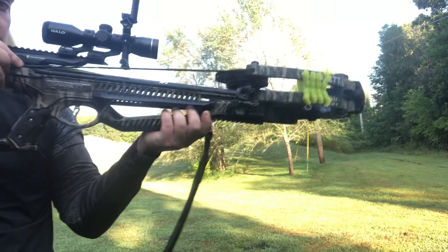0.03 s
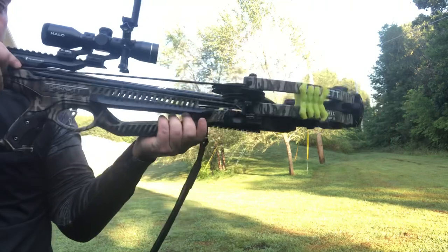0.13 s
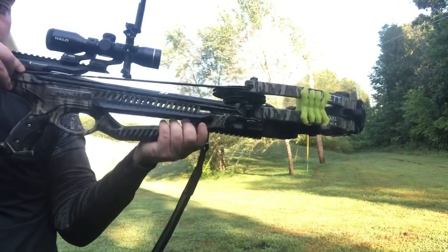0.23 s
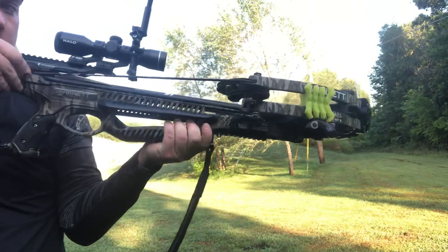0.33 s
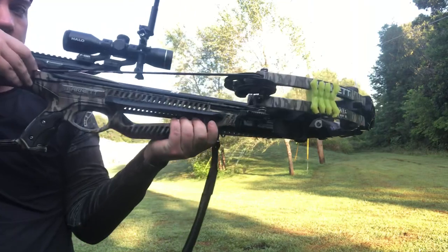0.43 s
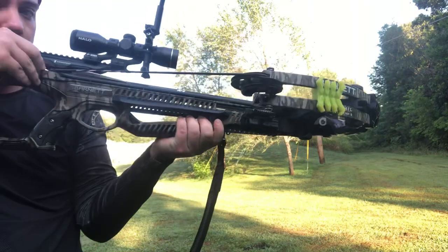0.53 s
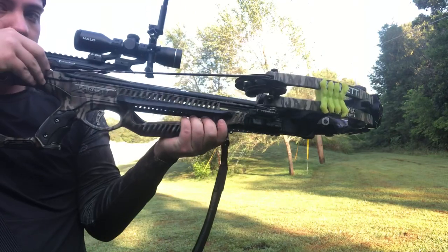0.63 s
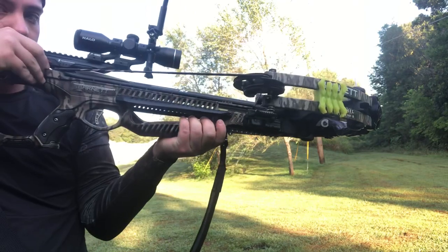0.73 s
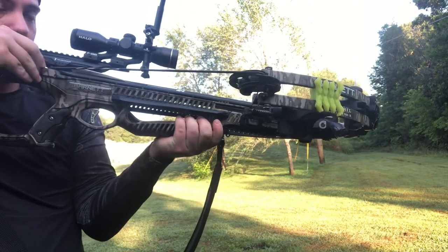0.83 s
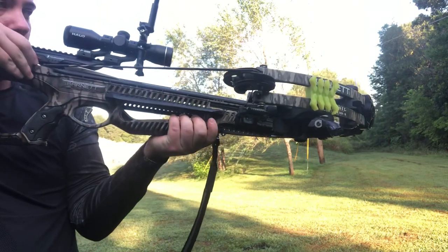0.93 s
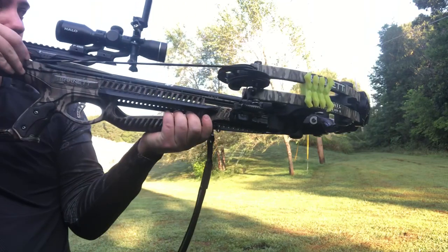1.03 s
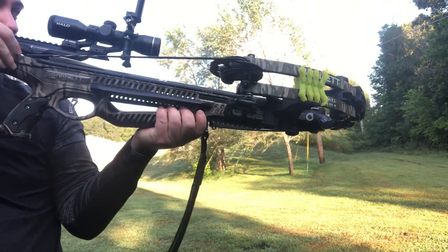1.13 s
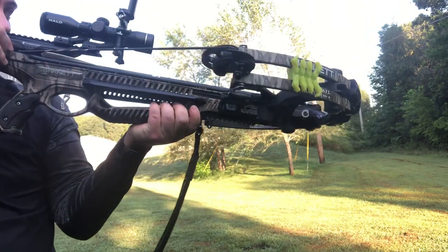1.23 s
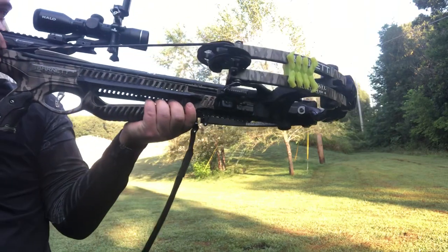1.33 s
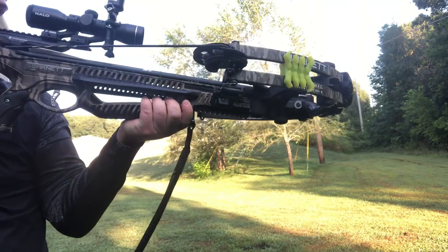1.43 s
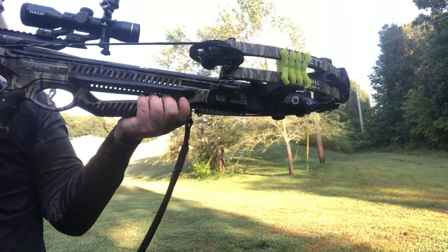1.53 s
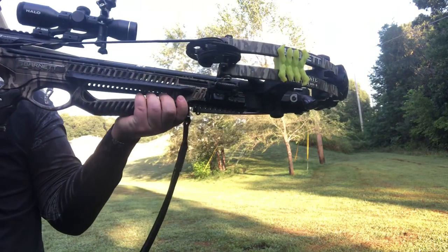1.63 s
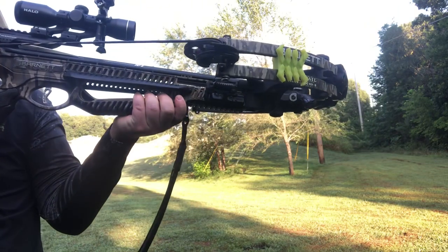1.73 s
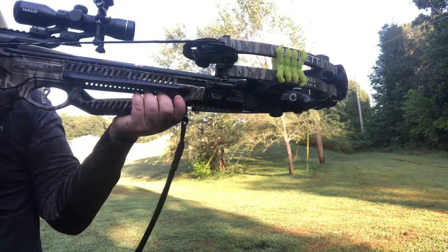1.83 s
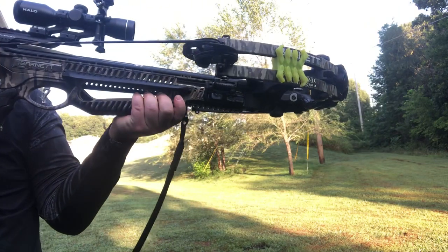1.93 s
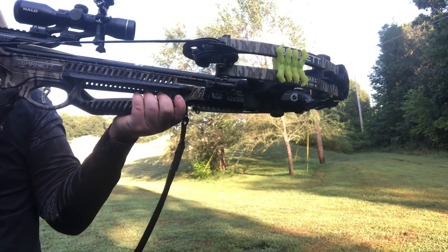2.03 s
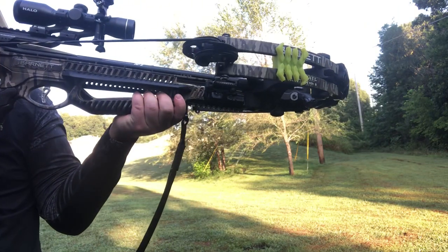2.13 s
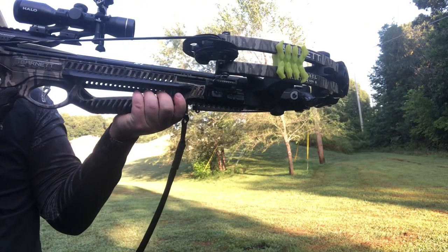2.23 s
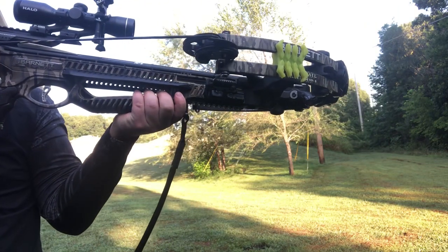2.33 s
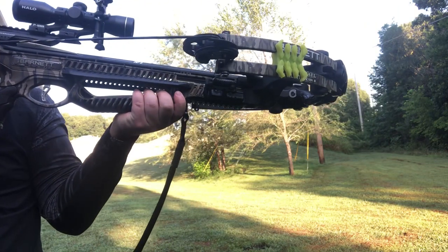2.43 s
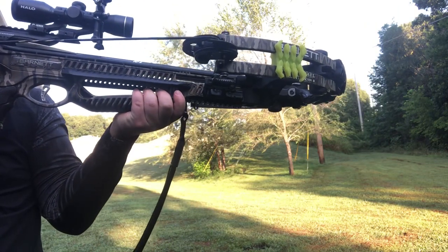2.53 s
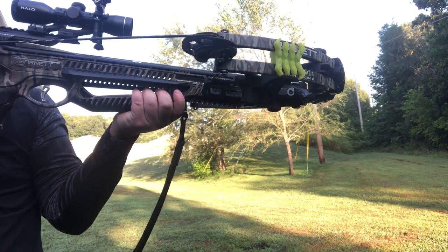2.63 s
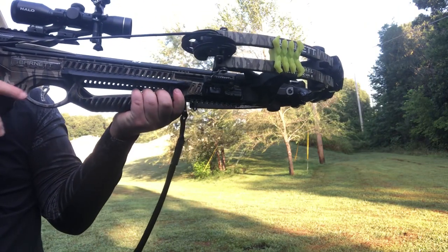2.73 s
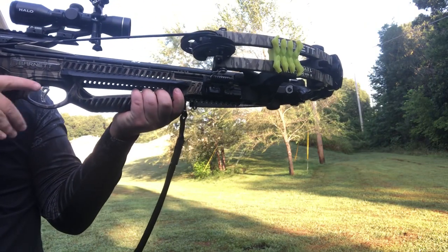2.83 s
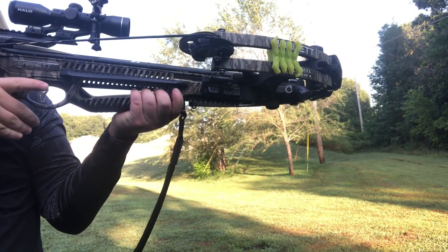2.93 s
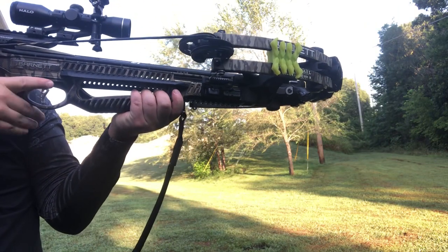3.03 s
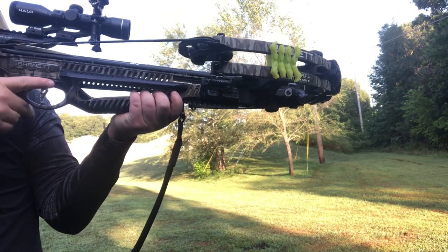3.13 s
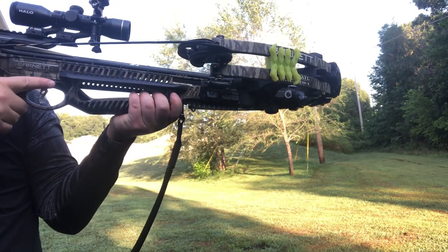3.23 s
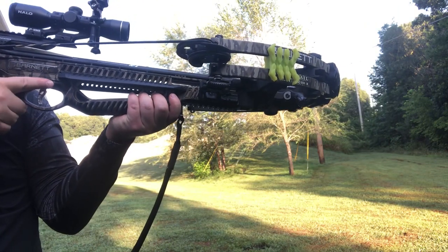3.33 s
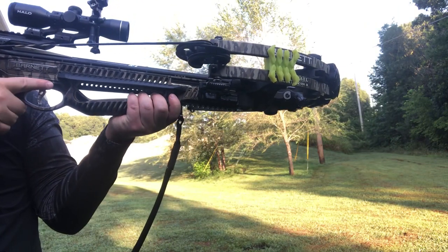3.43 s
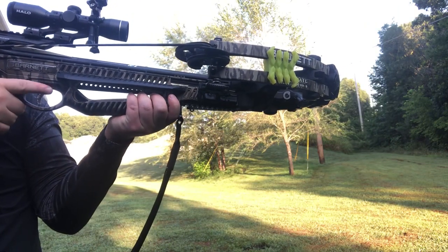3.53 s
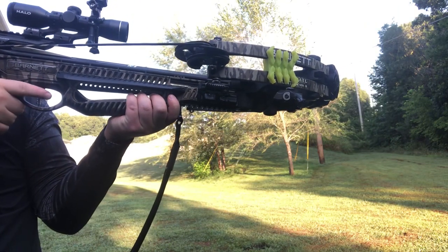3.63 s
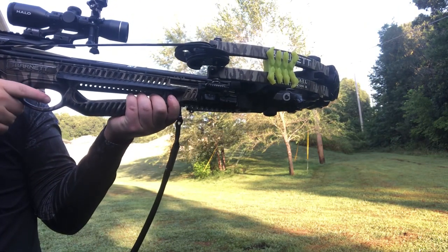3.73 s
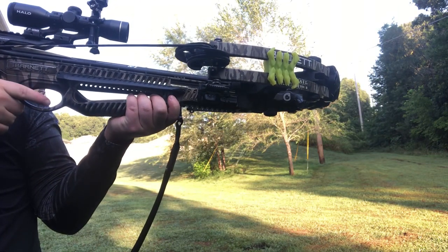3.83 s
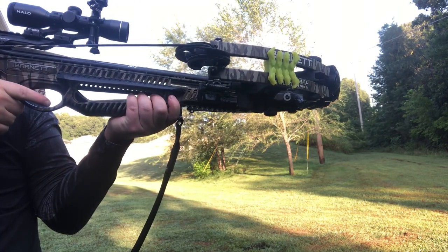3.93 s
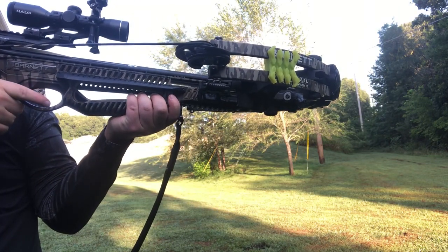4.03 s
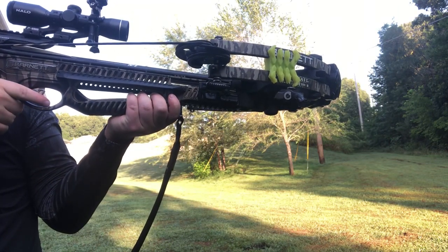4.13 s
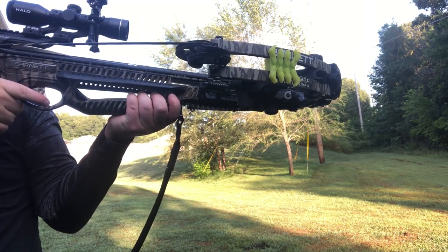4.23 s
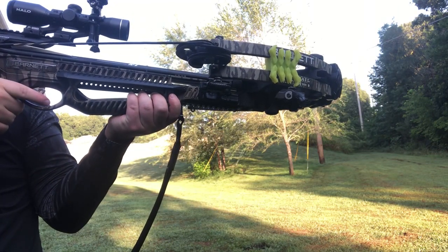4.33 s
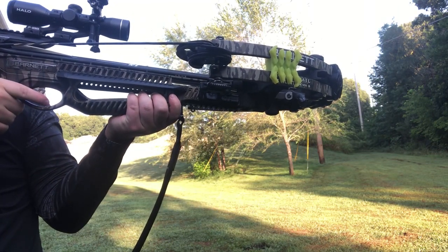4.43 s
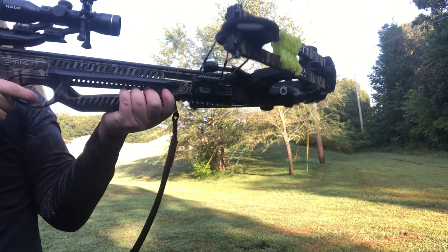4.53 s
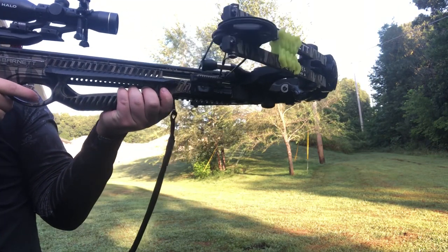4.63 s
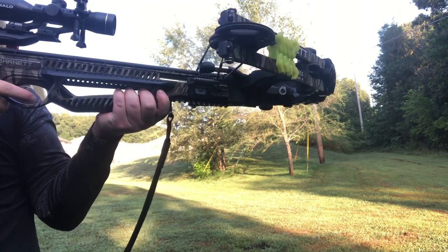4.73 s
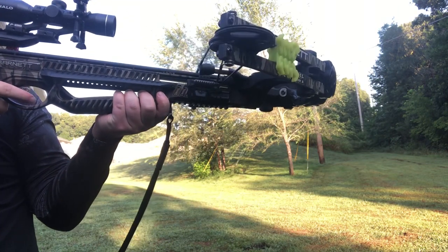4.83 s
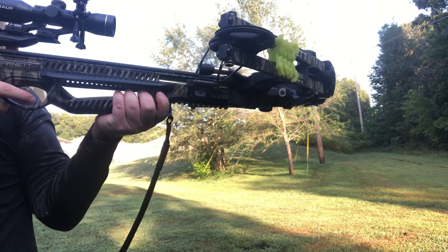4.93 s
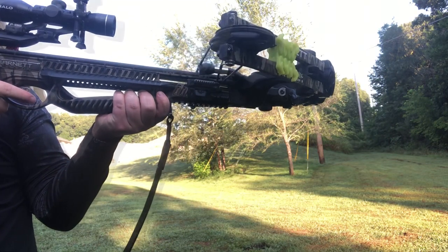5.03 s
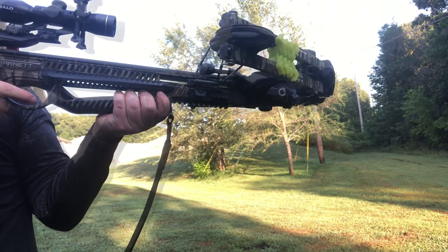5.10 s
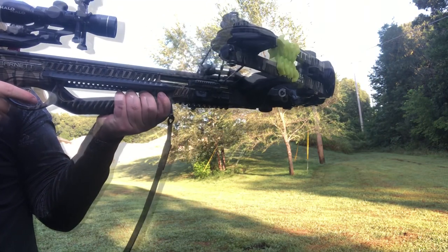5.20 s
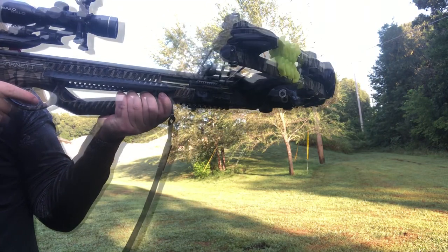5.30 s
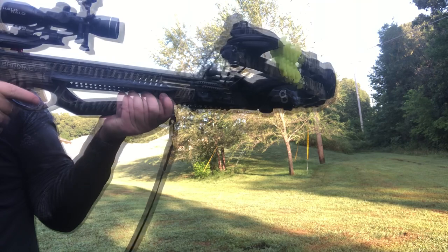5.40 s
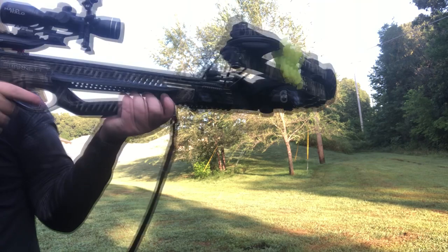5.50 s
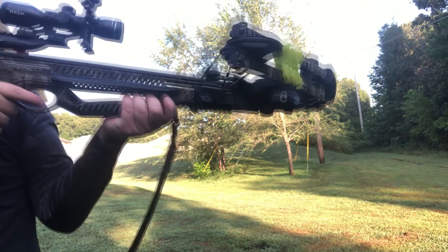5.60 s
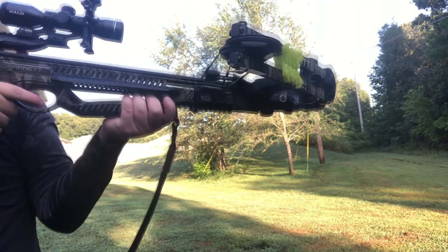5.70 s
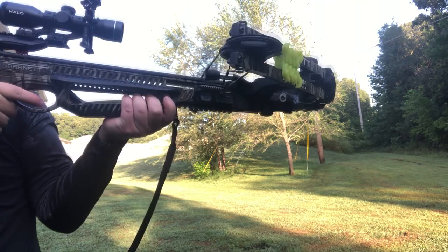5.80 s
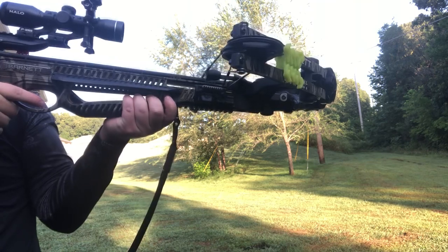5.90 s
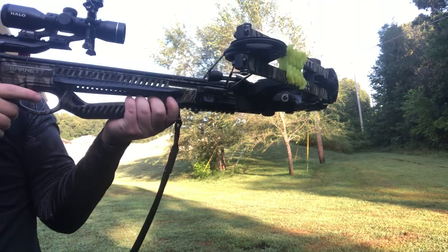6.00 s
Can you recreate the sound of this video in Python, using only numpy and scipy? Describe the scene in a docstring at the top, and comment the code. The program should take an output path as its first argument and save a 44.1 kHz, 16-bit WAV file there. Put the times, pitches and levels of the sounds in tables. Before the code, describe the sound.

Outdoors on a quiet lawn, a faint low hum of distant traffic and a far motor lies under insects and hissing leaves. Hands click lightly on a crossbow and cloth barely rustles. After about four and a half seconds the crossbow fires close to the microphone with one sharp, rattling crack. The bolt thuds into a target bag an instant later, the trees give a short echo, and the quiet background carries on.

```python
"""A crossbow fires close by on a lawn: the trigger lets go, the string slaps its stops and rebounds,
ringing the limbs as they heave, the bolt thuds into a target bag and the trees echo.
Before and after, hands tick on the stock and cloth rustles. Behind it all lie distant traffic, mains hum,
a far motor, insects and leaves. Early on the sound fades out and in, and the background returns quieter."""
import sys
import numpy as np
from scipy import signal
from scipy.fft import rfft, irfft
from scipy.io import wavfile
from scipy.ndimage import uniform_filter1d

SR = 44100
rng = np.random.default_rng(int(sys.argv[2]) if len(sys.argv) > 2 else 0)


def materialize(psi):
    """Save the field psi as 16-bit PCM at rate SR to the path in sys.argv[1].

    A 1-D psi becomes a single channel; in a 2-D psi each row is a channel.
    """
    bounded = np.clip(np.atleast_2d(psi).T, -1, 1)
    quanta = np.round(bounded * 32767).astype(np.int16)
    wavfile.write(sys.argv[1], SR, quanta)


N = 267246
T = np.arange(N) / SR
FADE_S, SHOT_S = 1.5705, 4.4935


def undb(db):
    """Gain of a level in dB."""
    return 10 ** (np.asarray(db) / 20)


def level(x, db):
    """Scale to an rms level."""
    return x * undb(db) / np.sqrt(np.mean(x ** 2))


def coloured(points):
    """Noise of rms 1, shaped by (frequency [Hz], level [dB]) points."""
    hz, db = np.transpose(points)
    bins_hz = np.arange(N // 2 + 1) * SR / N + 1
    curve_db = np.interp(np.log(bins_hz), np.log(hz), db, left=-90, right=-90)
    return level(irfft(rfft(rng.standard_normal(N)) * undb(curve_db), N), 0)


def band(x, hz, width_hz):
    """Two-pole band-pass, gain 1 at the centre."""
    return signal.lfilter(*signal.iirpeak(hz, hz / width_hz, SR), x)


def walk(rate_hz):
    """Smooth random drift with a spread near 1."""
    hold = int(SR / rate_hz)
    steps = np.repeat(rng.standard_normal(N // hold + 1), hold)
    return 1.326 * uniform_filter1d(uniform_filter1d(steps, hold), hold)[:N]


def decay(t, t60, rise):
    """Quick attack, then a fall of 60 dB in t60 seconds."""
    t = np.maximum(t, 0)
    return (1 - np.exp(-t / rise)) * 1000 ** (-t / t60)


def traffic():
    """Distant roads: one wash of noise, split into its low rumble and the rush above."""
    # road noise (frequency [Hz], relative level [dB])
    spectrum = [(8, -47), (25, -33), (35, -23.5), (50, -12.5), (85, -7.5), (110, -12.5), (170, -11),
                (300, -14.5), (1030, -18), (1380, -21), (2670, -32), (4000, -34), (4700, -41),
                (5200, -62.5)]
    wash = undb(0.29 * walk(2.042)) * coloured(spectrum)
    rumble = signal.sosfilt(signal.butter(2, 220, fs=SR, output="sos"), wash)
    return rumble, wash - rumble


def mains_hum():
    """Mains harmonics, each wavering a little in level."""
    # hum lines (frequency [Hz], relative level [dB])
    lines = [(120.1, -1.5), (240.2, -19), (480.4, -21.5)]
    return sum(undb(db + 0.5 * walk(5.8)) * np.sin(2 * np.pi * hz * T) for hz, db in lines)


def far_motor():
    """A motor drones in three harmonics, its pitch slowly sagging."""
    # motor's course (time [s], pitch [Hz], relative level [dB])
    course = [(0, 132, -12), (1.5, 132, -9), (3, 129.7, -5), (4.4, 129.6, -14.5), (5.301, 126.9, -9),
              (6.06, 125.8, -1.5)]
    # harmonics (multiple, level offset [dB])
    orders = [(1, 2), (2, -4.5), (3, -9.5)]
    s, hz, db = np.transpose(course)
    phase = 2 * np.pi * np.cumsum(np.interp(T, s, hz) * (1 + .003 * walk(4))) / SR
    drone_db = np.interp(T, s, db)
    return sum(undb(drone_db + offset + 1.4 * walk(1.33)) * np.sin(k * phase) for k, offset in orders)


def insect_chorus():
    """Far insects blur into narrow, throbbing bands of noise."""
    # voices (centre [Hz], width [Hz], relative level [dB], throb rate [Hz], throb depth)
    voices = [(4295, 430, -12, 31, 0.294), (5220, 570, -6, 9, .1), (5684, 660, -8, 17, .1),
              (6430, 400, -13.5, 33, .5)]
    out = np.zeros(N)
    for hz, width, db, throb_hz, depth in voices:
        hump = [(hz - width, -25), (hz - width / 2, -2), (hz, 0), (hz + width / 2, -4), (hz + width, -22)]
        throb = 1 + depth * np.sin(2 * np.pi * np.cumsum(throb_hz * (1 + 0.062 * walk(1.2))) / SR)
        out += undb(db + .8 * walk(4)) * throb * coloured(hump)
    return out


def leaves():
    """A steady, airy hiss of foliage."""
    # leaf hiss (frequency [Hz], relative level [dB])
    spectrum = [(2000, -25), (4000, -8), (7000, -1.5), (9000, -13.5), (13000, -14), (14800, -23),
                (15400, -27.5), (16100, -60)]
    return undb(-14) * coloured(spectrum)


def crickets():
    """Nearer crickets chirp in bouts; each chirp is a train of pulses that fall in pitch."""
    # bouts (pitch [Hz], relative level [dB], pulse rate [Hz], chirp length [s],
    # start [s], end [s], chirp period [s])
    bouts = [(7680, -13, 80, .07, .16, 6.0, .303), (8320, -13, 80, .075, .27, 4.3, .305),
             (12850, -24, 30, .03, .96, 1.25, .09), (12850, -24, 30, .03, 1.72, 2.05, .097),
             (12850, -24, 30, .03, 5.13, 5.95, .099)]
    out = np.zeros(N)
    for hz, db, pulse_hz, length, first, last, period in bouts:
        for s in np.arange(first, last, period):
            late, loud = rng.standard_normal(2)
            start = s + .012 * late - length / 2
            span = slice(int(start * SR), int((start + length) * SR))
            cycle = (T[span] - T[span][0]) * pulse_hz % 1
            tone = np.sin(2 * np.pi * np.cumsum(hz * (1.02 - .085 * cycle)) / SR)
            pulses = np.sin(np.pi * np.minimum(cycle / .75, 1)) ** 2
            out[span] += undb(db + 1.5 * loud) * pulses * tone
    return out


def handling():
    """Hands tap the stock, ringing a damped resonance with a bright edge; cloth rustles in soft swells."""
    # taps (time [s], peak level [dB], centre [Hz])
    taps = [(0.212, -54, 11000), (2.0898, -39, 3300), (2.254, -52, 3300), (2.264, -53, 3300),
            (2.99, -65, 9000), (5.065, -48, 2100)]
    # cloth swells (time [s], level [dB], half length [s])
    rustles = [(.3, -84, 0.94), (0.158, -75, 0.076), (.62, -85, 0.12), (.835, -77, 0.044),
               (2.868, -86, 0.051), (6.0, -89.5, .15)]
    ticks, t = np.zeros(N), T[:SR // 20]
    for s, db, hz in taps:
        tap = band(rng.standard_normal(len(t)) * decay(t, t60=.008, rise=.00017), hz, .45 * hz)
        tick = band(tap, hz, .45 * hz) + undb(-14) * tap
        ticks[int(s * SR):][:len(t)] += undb(db) * tick / np.max(np.abs(tick))
    swells = sum(undb(db) * np.exp(-((T - s) / half) ** 2) for s, db, half in rustles)
    flutter = undb(2 * walk(60))
    cloth = coloured([(6000, -30), (9000, 0), (13000, -2), (15700, -5), (16000, -50)])
    return ticks + swells * flutter * cloth


def struck(hits, modes, contact):
    """Each blow chatters three times, weaker and duller in turn: a broad crack over ringing modes."""
    gap, crack_step_db, body_step_db, dulling, t60, rise = contact
    out, t = np.zeros(N), T[:SR // 4]
    ring = sum(undb(db) * 1000 ** (-t / ring_t60) * np.cos(2 * np.pi * hz * t)
               for hz, db, ring_t60 in modes)
    envelope = decay(t, t60, rise)
    for s, crack_db, body_db, centre_hz in hits:
        for k in range(3):
            snap, push = rng.standard_normal((2, len(t)))
            hz = centre_hz * dulling ** k
            crack = level(band(snap, hz, 0.45 * hz), crack_db + k * crack_step_db) * envelope
            body = signal.fftconvolve(push * envelope ** 2, ring)[:len(t)]
            body /= np.sqrt(np.sum(body ** 2) / (.004 * SR))  # the energy of 4 ms at rms 1
            start = int((s + k * gap * (1 + .2 * rng.uniform(-1, 1))) * SR)
            out[start:start + len(t)] += crack + undb(body_db + k * body_step_db) * body
    return signal.sosfilt(signal.butter(3, 180, "high", fs=SR, output="sos"), out)  # cut the lows below 180 Hz


def crossbow():
    """Trigger, release, then the string slaps its stops and rebounds about every 11 ms."""
    # blows (time [s], crack level [dB], body level [dB], crack centre [Hz])
    knocks = [(4.4705, -56, -68, 9000), (4.480, -47, -45, 5000), (4.4935, -11, -28, 9000),
              (4.4955, -12, -30, 4500), (4.5033, -14, -15, 7000), (4.514, -23, -33, 7000),
              (4.524, -22, -25, 6500), (4.533, -19, -36, 3300), (4.5475, -26, -55, 6500),
              (4.5585, -24, -38, 6000), (4.568, -31, -52, 7000), (4.580, -27, -46, 5000),
              (4.592, -36, -62, 6000)]
    # riser and limb modes (frequency [Hz], relative level [dB], t60 [s])
    modes = [(479, -10, 0.043), (725, 2, 0.022), (1016, -3.5, 0.024), (1150, 2, 0.016), (1475, -6, 0.038),
             (1886, -4, 0.013), (2464, -9, .04), (3100, -4, 0.036), (3437, -6.5, 0.027), (4260, -12, 0.034)]
    # chatter (gap [s], crack step [dB], body step [dB], centre ratio, t60 [s], rise [s])
    contact = (.003, -3.5, -4.5, .65, .016, .00023)
    return struck(knocks, modes, contact)


def tree_echo():
    """The trees scatter the shot back as a diffuse tail of noise."""
    # echo bands (centre [Hz], level [dB], t60 [s])
    tails = [(201, -49.5, 0.47), (400, -45, 0.4), (800, -48, .6), (1700, -42, 0.96), (3500, -36.5, 0.71),
             (6500, -38.5, 0.37), (11000, -43.5, .31)]
    out = np.zeros(N)
    for hz, db, t60 in tails:
        wash = band(band(rng.standard_normal(N), hz, hz), hz, hz)
        out += level(wash, db) * decay(T - SHOT_S, t60, rise=.0069)
    return out


def heave():
    """Heavy parts swing in short, low pulses: first the limbs, then the target bag."""
    # swings (time [s], frequency [Hz], level [dB], length [s])
    swings = [(4.498, 135, -40, .022), (4.511, 64, -30, .030), (4.566, 350, -41, .016),
              (4.624, 360, -30, .024), (4.678, 270, -42, .026)]
    out = np.zeros(N)
    for s, hz, db, length in swings:
        arch = np.sin(np.pi * np.clip((T - s) / length, 0, 1))
        out += undb(db) * arch * np.sin(2 * np.pi * hz * (T - s))
    return out


def bolt_impact():
    """The bolt thuds into the target, then shaft and bag settle."""
    # blows (time [s], crack level [dB], body level [dB], crack centre [Hz])
    hits = [(4.6208, -18, -32, 3700), (4.639, -43, -43, 8000), (4.649, -34, -50, 4500),
            (4.6765, -40, -53, 3500)]
    # bag modes (frequency [Hz], relative level [dB], t60 [s])
    modes = [(208, 1, 0.031), (284, 1, 0.034), (434, -2, .05), (652, 2, 0.03), (1010, -21, .03)]
    # chatter (gap [s], crack step [dB], body step [dB], centre ratio, t60 [s], rise [s])
    contact = (.0033, -6.5, -.8, .88, .010, .000067)
    return struck(hits, modes, contact)


def scene():
    """The garden bed on its slow level ride, with the handling and the shot up front."""
    # the bed sags, then swells at the end (time [s], gain [dB])
    swell = [(4.9, 0), (5.35, -2), (6.06, 4.5)]
    # lift on rumble and hum, dipping just after the shot (time [s], gain [dB])
    bass_lift = [(0, 7.5), (.7, 11), (2.6, 9), (4.47, 12), (4.55, 3), (4.8, 3), (4.95, 12), (5.6, 13),
                 (6.06, 9)]
    bed_db = np.where(T < FADE_S, -58.5, -63) + np.interp(T, *np.transpose(swell))
    rumble, rush = traffic()
    bass = undb(np.interp(T, *np.transpose(bass_lift))) * (rumble + mains_hum() + far_motor())
    garden = undb(6) * rush + bass + insect_chorus() + crickets() + leaves()
    hands = handling()
    soft_top = signal.butter(14, 16000, fs=SR, output="sos")
    shot = signal.sosfilt(soft_top, tree_echo() + crossbow() + bolt_impact()) + heave()
    return (undb(bed_db) * garden + hands + shot)[None]


def record(dry):
    """Peaks are rounded off, the sound dips once to silence, and the very top is cut."""
    ceiling, fade_half_s, top_hz = .85, .034, 16900
    rounded = ceiling * np.tanh(dry / ceiling)
    fade = np.minimum(np.abs(T - FADE_S) / fade_half_s, 1)
    return signal.sosfilt(signal.ellip(10, .2, 80, top_hz, fs=SR, output="sos"), rounded * fade)


dry = scene()
out = record(dry)
materialize(out)
```